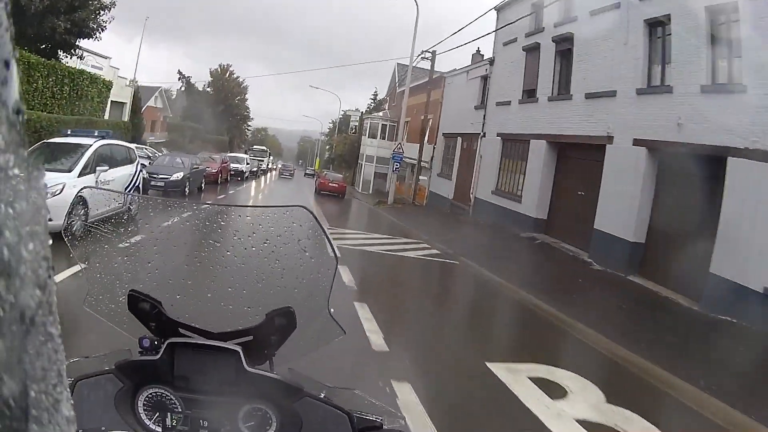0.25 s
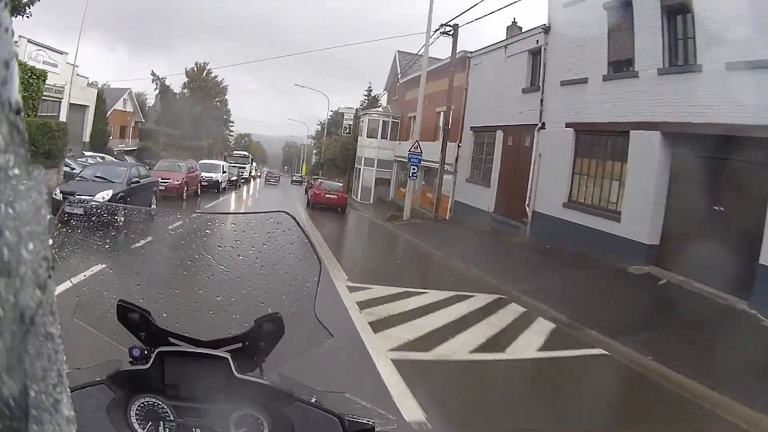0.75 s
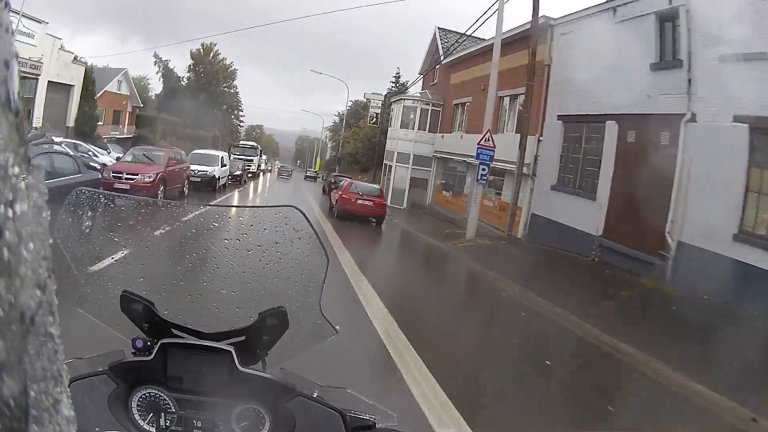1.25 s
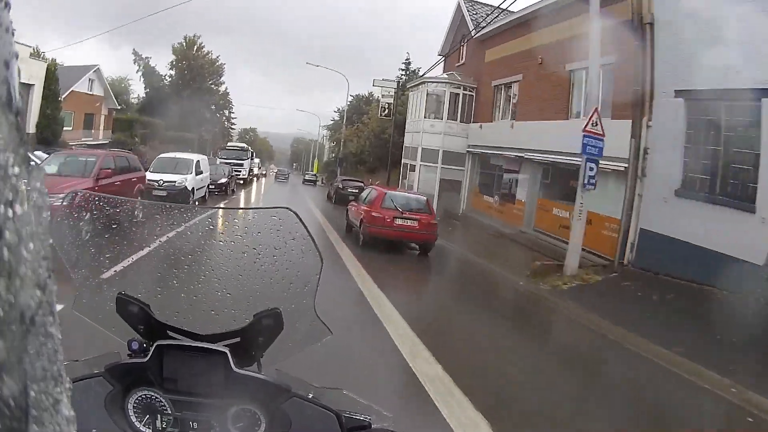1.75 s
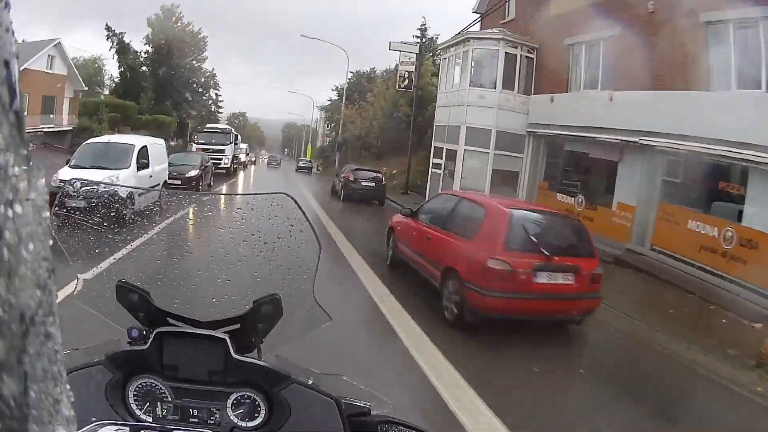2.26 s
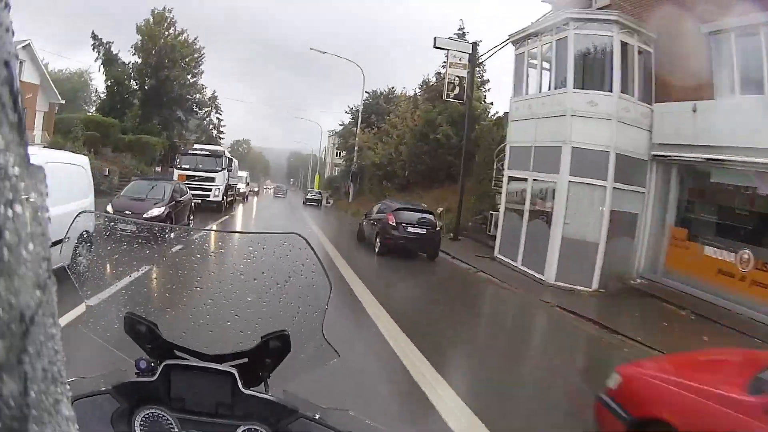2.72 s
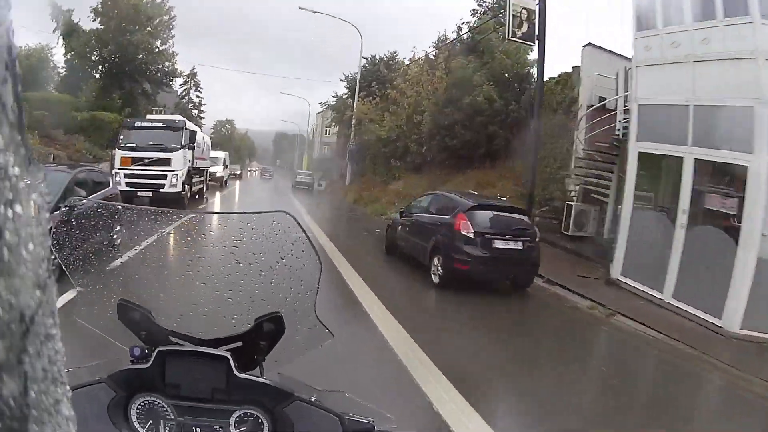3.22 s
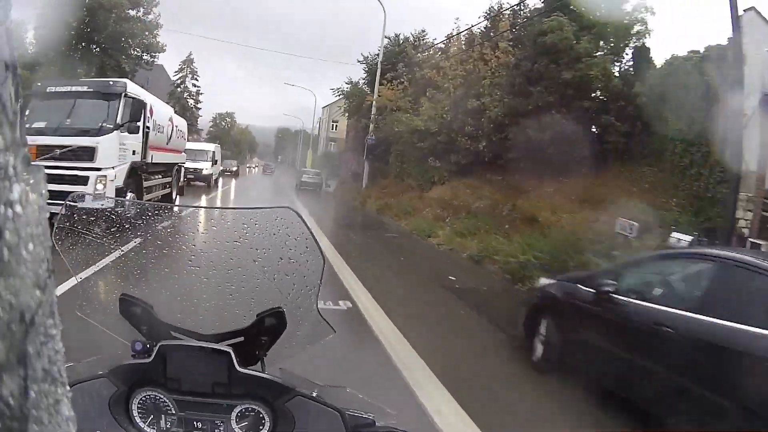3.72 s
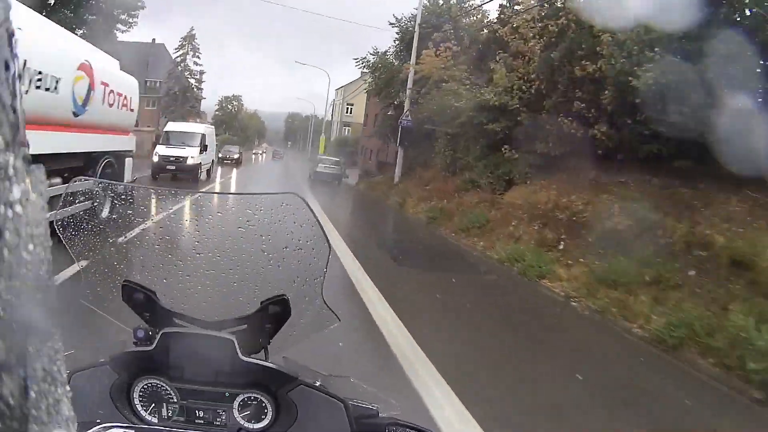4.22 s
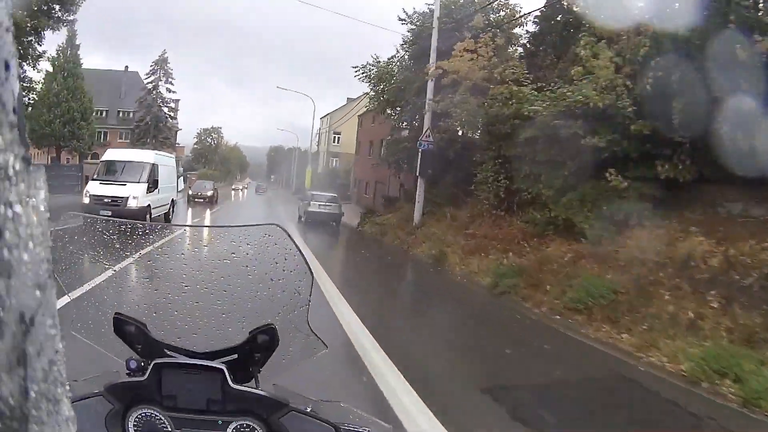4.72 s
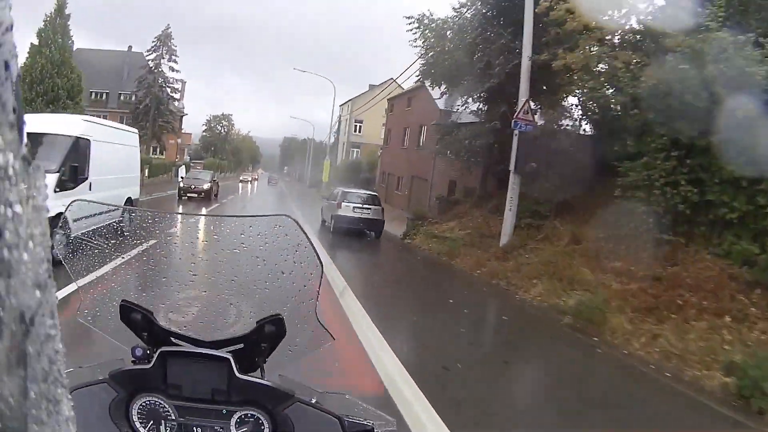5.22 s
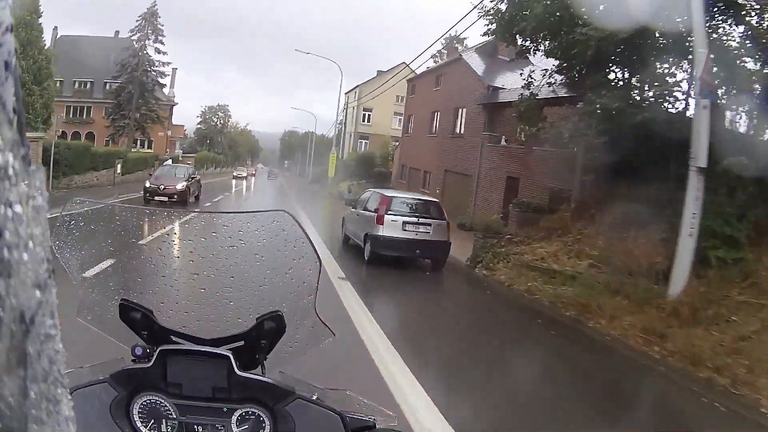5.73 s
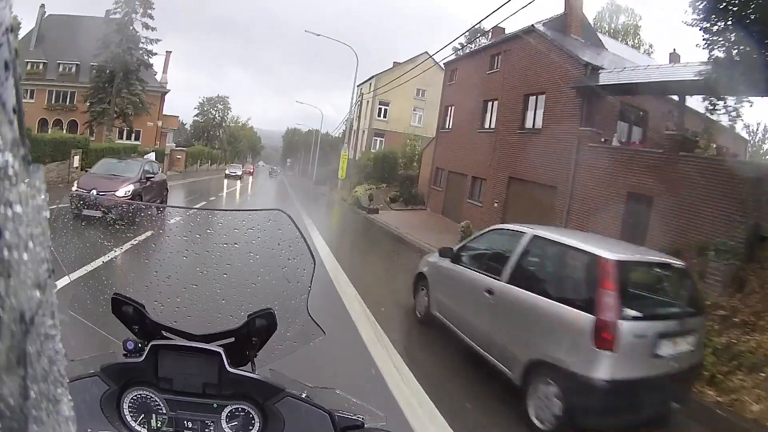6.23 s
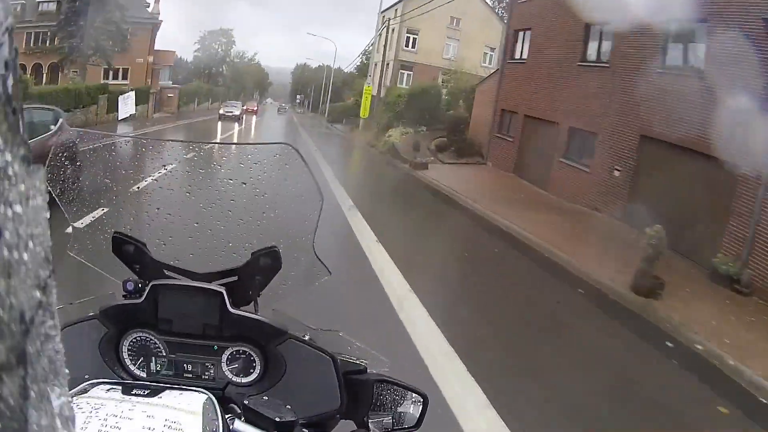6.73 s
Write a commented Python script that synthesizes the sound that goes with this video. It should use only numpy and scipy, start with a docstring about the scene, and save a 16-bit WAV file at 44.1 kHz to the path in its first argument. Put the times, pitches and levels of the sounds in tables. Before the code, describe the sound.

Heavy raindrops tap close to the microphone over the steady wind rumble and low engine hum of a motorcycle ride.

```python
"""Motorcycle in heavy rain

A steady ride along a wet street, heard at the two ports of a microphone on the rider's helmet.
The engine hums at multiples of its crank speed under wind, tyre roar, spray and the swish of traffic.
Raindrops tick on the hard shell around the microphone: each impact excites damped modes and splashes."""
import sys
import numpy as np
from scipy import signal
from scipy.fft import rfft, irfft, next_fast_len
from scipy.io import wavfile
from scipy.ndimage import uniform_filter1d

SR = 44100
rng = np.random.default_rng(int(sys.argv[2]) if len(sys.argv) > 2 else 0)


def unload_audio(sound):
    """Save the sound as a 16-bit wav file, at the path given as the first command line argument."""
    columns = np.transpose(np.atleast_2d(sound))
    # keep every value between -1 and 1, then stretch to whole-number steps
    steps = np.round(np.clip(columns, -1, 1) * 32767)
    wavfile.write(sys.argv[1], SR, steps.astype(np.int16))


N = 307377

# Spectral densities of the noise sources: frequency_hz, relative_db
WIND_SPECTRUM = [(20, -17), (28, -9), (38, -4.5), (50, -8.5), (72, -0.5), (90, -1.5), (125, -4.5),
                 (190, -15), (250, -15)]
TYRE_SPECTRUM = [(150, -6), (194, -7.5), (269, -2), (366, -6.5), (437, -6.5), (520, -11.5), (700, -36.5)]
TRAFFIC_SPECTRUM = [(480, -3.5), (600, 2), (800, -2.5), (1000, -7.5), (1400, -14.5)]
SPRAY_SPECTRUM = [(900, 9.5), (1300, -2.5), (1800, -19), (2700, -22), (3500, -11.5), (4800, -18),
                  (9400, -19), (12200, -26), (13000, -40)]
SPLASH_SPECTRUM = [(4000, 18), (5500, 13), (7000, 10.5), (9000, 9), (11000, 1), (13000, -10)]
HISS_SPECTRUM = [(2500, 0), (6000, 2), (12600, 0.17)]
# Strength of the wind on the helmet and of passing traffic: time_s, level_db
WIND_LEVEL = [(0, -40), (2.8, -39), (3.5, -36), (4.2, -38), (5, -40.5), (6.97, -40)]
TRAFFIC_LEVEL = [(0, -55.5), (1.3, -56.5), (3.6, -53.5), (4.1, -53), (4.5, -48.5), (5.2, -54), (6.0, -56.5),
                 (6.5, -52), (6.97, -57.5)]
# Crank speed: time_s, rotation_hz
CRANK_SPEED = [(0, 36.5), (.4, 36.8), (.8, 35.7), (1.4, 35.3), (1.9, 36.1), (2.5, 37.1), (2.9, 36.3),
               (3.5, 36.7), (4.0, 36.4), (4.5, 35.4), (5.1, 36.2), (5.7, 37.5), (6.1, 37.2), (6.5, 38.5),
               (6.97, 40)]
# Engine orders: cycles_per_turn
ENGINE_ORDERS = [1, 2, 3, 4, 12]
# Slow swelling and sinking of each order: spread_db
ORDER_SURGE = [1.0, 1.2, 1.5, 3.0, 2.5]
# Varying orders, with the gear whine at order 12: time_s, second_db, third_db, whine_db
ORDER_LEVELS = [(0.05, -35, -46, -50.5), (0.28, -37.5, -47, -47), (0.58, -40, -40, -49),
                (0.74, -36, -50, -49), (0.82, -49, -43, -50.5), (1.1, -38, -49.5, -53.5),
                (1.37, -44, -35, -52), (2.5, -39, -43.5, -55.5), (2.58, -40, -53, -56.5),
                (2.64, -38, -42, -49), (2.68, -41, -59, -54.5), (3.54, -32.5, -43, -49.5),
                (3.77, -50.5, -48.5, -53.5), (3.86, -33.5, -45, -48.5), (4.07, -56, -37, -54.5),
                (4.19, -35, -44, -52), (4.48, -43, -46, -55.5), (4.84, -43.5, -38, -49),
                (5.19, -42.5, -43, -56), (5.84, -38, -39, -55), (6.12, -37, -48, -58),
                (6.45, -36, -41.5, -53), (6.56, -46, -41, -59), (6.93, -30, -41, -53)]
# Resonances of the shell: frequency_hz, relative_db, t60_s
SHELL_MODES = [(517, 5, 0.032), (627, -7.5, 0.029), (741, -11, 0.07), (791, 11.5, 0.022), (902, 6, 0.021),
               (1010, 4, 0.034), (1206, -1, 0.072), (1291, 7, 0.034), (1467, 1.5, 0.055),
               (1666, 2.5, 0.053), (1744, 13, 0.015), (1970, -4, 0.037), (2135, 2, 0.05), (2202, 5, 0.027),
               (2473, -1, 0.03), (2650, -3.5, 0.015), (2883, 2.5, 0.026), (3031, -3, 0.017),
               (3210, -2.5, 0.026), (3444, 1.5, 0.013), (3747, -8, 0.03), (4060, -9.5, 0.02),
               (4200, -14, 0.012)]
# Dull knocks through the shell: start_s, peak_db, pitch_hz, swell_s
SHELL_KNOCKS = [(.527, -47, 296, 0.0018), (1.136, -25.5, 280, 0.00091), (1.493, -25.5, 343, 0.0013),
                (1.557, -26, 239, 0.0013), (4.146, -30.5, 431, 0.0014), (5.927, -42, 231, 0.0028),
                (6.21, -33, 232, 0.0016), (6.2168, -45, 326, 0.0034), (6.2191, -19.5, 346.2, 0.0011)]
# Strength of the fine and middling rain: time_s, gain_db
RAIN_GAIN = [(0, 1.5), (1.3, 1), (2.4, 1), (3.2, 0), (4.5, 2), (5.6, -0.5), (6.97, 0)]
# Large drop impacts: start_s, ring_hz, lower_peak_db, upper_peak_db, splash_peak_db
LARGE_DROPS = [(0.0503, 1830, -32.5, -43, -55), (0.1566, 1460, -36.5, -45, -49),
               (0.2206, 3730, -48, -52, -37), (0.24, 2970, -30, -38, -50), (0.2548, 2130, -30.5, -37, -42),
               (0.3357, 1800, -40, -46, -45), (0.3543, 3500, -46, -44, -45),
               (0.3714, 2910, -35, -43, -43.5), (0.385, 2530, -40, -47, -60), (0.4065, 2660, -42, -46, -60),
               (0.4204, 1740, -38, -46, -56), (0.439, 2820, -43, -43, -50), (0.4582, 2270, -40, -44, -48),
               (0.5295, 1240, -26.5, -37, -38), (0.5661, 3220, -38, -38, -36.5),
               (0.5715, 1790, -33, -37, -50), (0.6055, 2970, -27.5, -33.5, -50),
               (0.6514, 2420, -40, -43, -54), (0.6683, 1560, -36, -52, -55),
               (0.6949, 3680, -42, -35, -37.5), (0.703, 2930, -35.5, -44, -51),
               (0.7208, 2420, -41, -45, -46), (0.7714, 3410, -50, -44, -57), (0.7871, 1730, -45, -56, -52),
               (0.8246, 2520, -33.5, -33.5, -38.5), (0.8677, 3320, -49, -42, -42),
               (0.8769, 1750, -39, -42, -56), (0.8902, 2710, -33, -36.5, -48),
               (0.8977, 1240, -52, -54, -48), (0.9072, 2190, -36, -43, -50),
               (0.9509, 2140, -31, -38, -40.5), (0.9712, 2880, -35, -36, -43),
               (0.9974, 1740, -38, -45, -51), (1.005, 1400, -39, -50, -53), (1.0215, 2740, -52, -45, -54),
               (1.0712, 2880, -34, -37, -43), (1.0918, 2870, -40, -41, -53), (1.1036, 3460, -47, -45, -51),
               (1.1311, 3090, -44, -36.5, -47), (1.224, 1730, -25, -34.5, -44),
               (1.2338, 1390, -40, -42, -51), (1.261, 3190, -39, -45, -55),
               (1.293, 3480, -44, -32.5, -35.5), (1.307, 2520, -33, -36.5, -41),
               (1.3381, 1180, -35, -42, -42), (1.3461, 2090, -31, -43, -47), (1.404, 1910, -44, -41, -44),
               (1.4192, 1540, -39, -44, -41), (1.4385, 1590, -30, -45, -45), (1.445, 1500, -44, -43, -52),
               (1.4592, 1390, -40, -48, -51), (1.4917, 1610, -23, -31, -34.5), (1.498, 1260, -37, -39, -45),
               (1.519, 1520, -38, -45, -52), (1.5274, 2590, -43, -42, -45), (1.5577, 1990, -37, -53, -53),
               (1.5747, 3100, -39, -39, -51), (1.6376, 1370, -35.5, -48, -54),
               (1.666, 3180, -35, -40.5, -49), (1.6733, 1650, -33, -47, -54), (1.6966, 2930, -39, -41, -49),
               (1.709, 2940, -44, -43, -52), (1.722, 1450, -37, -44, -57), (1.7455, 1310, -36.5, -48, -57),
               (1.7941, 1720, -25, -35, -48), (1.8076, 1110, -29, -41, -54),
               (1.8152, 2000, -28.5, -31.5, -36.5), (1.8757, 2550, -36.5, -39.5, -50),
               (1.933, 1600, -36, -48, -45), (1.947, 2040, -30.5, -40, -50), (1.9837, 4200, -50, -46, -44),
               (2.0182, 1680, -30.5, -40, -60), (2.0963, 1530, -39, -46, -61),
               (2.1339, 2990, -39, -34, -41), (2.1705, 2500, -30, -37, -48),
               (2.1986, 2880, -33.5, -36, -44), (2.227, 2570, -40, -44, -51), (2.2878, 1690, -36, -42, -60),
               (2.3005, 2640, -36, -40, -51), (2.3514, 3440, -41, -34, -33.5),
               (2.3735, 2550, -33, -35.5, -41), (2.3847, 3370, -45, -47, -46), (2.402, 3080, -45, -42, -52),
               (2.4136, 2560, -44, -50, -50), (2.4911, 2190, -32.5, -39, -47),
               (2.5463, 2110, -34, -44, -51), (2.593, 2950, -34.5, -40.5, -51),
               (2.6506, 3810, -47, -46, -43), (2.6786, 2050, -38.5, -46, -58),
               (2.7495, 1250, -38, -58, -65), (2.7716, 1390, -40, -41.5, -47),
               (2.8149, 2360, -36, -37, -37.5), (2.8203, 1650, -34.5, -47, -67),
               (2.8608, 1960, -36, -44, -56), (2.8717, 2150, -41, -46, -46), (2.8987, 2680, -42, -44, -48),
               (2.9605, 2390, -40, -44, -52), (2.9862, 4160, -40, -41, -43), (3.0932, 3190, -36, -37, -62),
               (3.1345, 2430, -37.5, -45, -55), (3.2049, 3090, -52, -47, -52),
               (3.2276, 1730, -33.5, -45, -56), (3.3936, 1110, -33, -44, -55),
               (3.4379, 2860, -43, -46, -56), (3.452, 2900, -49, -40, -46), (3.4609, 1610, -38, -47, -39),
               (3.4716, 3260, -30.5, -33.5, -38), (3.4799, 1730, -32, -46, -52),
               (3.5251, 2900, -39, -35, -43), (3.5393, 1860, -38.5, -47, -56),
               (3.584, 3580, -40, -36.5, -36.5), (3.6847, 3530, -54, -39, -45),
               (3.7169, 1840, -34, -39, -48), (3.7225, 1250, -35, -36.5, -63),
               (3.7508, 3200, -39, -43, -51), (3.7932, 1650, -32, -49, -52),
               (3.851, 1640, -34.5, -38.5, -46), (3.9035, 1550, -42, -46, -48),
               (3.9339, 3340, -51, -43, -44), (3.986, 1660, -43, -43, -43),
               (3.9913, 2830, -36.5, -37, -39.5), (3.9968, 3030, -44, -48, -50),
               (4.025, 2870, -48, -44, -50), (4.0551, 2250, -40, -42, -47), (4.0992, 2270, -34.5, -41, -46),
               (4.239, 1310, -33.5, -54, -45), (4.4199, 3400, -39, -39, -46), (4.4277, 3590, -46, -37, -42),
               (4.455, 3400, -37, -39, -44), (4.47, 1670, -38, -45, -43.5), (4.512, 3160, -36, -38.5, -53),
               (4.6413, 2810, -40, -47, -56), (4.6523, 2050, -40, -44, -48),
               (4.6914, 3250, -38, -41, -45.5), (4.7237, 1110, -38, -46, -56),
               (4.7339, 1110, -35, -43, -44), (4.8042, 3540, -49, -45, -42),
               (4.8375, 1400, -28.5, -41, -43), (4.8423, 1690, -36, -59, -57), (4.866, 1780, -41, -42, -56),
               (5.0785, 3170, -44, -44, -38.5), (5.0888, 3470, -46, -33.5, -41),
               (5.1494, 1810, -37, -50, -60), (5.169, 2890, -39, -47, -56), (5.216, 2880, -32, -35, -45.5),
               (5.3423, 2930, -43, -40, -51), (5.3607, 2910, -41, -40, -42),
               (5.3933, 3200, -53.5, -47, -47), (5.4312, 3380, -39, -39, -37.5),
               (5.5458, 1290, -28.5, -41, -44), (5.6229, 2060, -30, -45, -63),
               (5.8009, 1743, -39.5, -52, -55), (5.8604, 2530, -39.5, -47, -49),
               (5.8797, 3382, -39, -38, -38), (5.9314, 1320, -23, -36, -49), (5.9517, 1320, -40, -47, -57),
               (6.0043, 1750, -33, -38, -43), (6.015, 3030, -40, -44, -46), (6.0981, 1720, -33, -37.5, -42),
               (6.1303, 3210, -43, -39, -48), (6.1427, 3000, -41, -39, -53), (6.148, 3690, -44, -43, -45),
               (6.213, 3250, -34, -46, -47), (6.2167, 1150, -34, -43, -61), (6.2273, 1510, -37, -61, -63),
               (6.295, 2540, -55, -42.5, -43), (6.327, 3260, -39, -45, -42), (6.3552, 1250, -36, -47, -54),
               (6.4001, 2620, -39, -40, -42), (6.4157, 1970, -39, -42, -52), (6.465, 1590, -29.5, -34, -42),
               (6.5422, 3180, -41, -41, -49), (6.5715, 2090, -37.5, -37, -50),
               (6.5962, 3410, -39, -41, -50), (6.6232, 3570, -39, -45, -41.5),
               (6.6576, 1670, -39, -37, -46), (6.6659, 3220, -52, -42, -49),
               (6.6996, 2520, -33.5, -35.5, -44), (6.7186, 3900, -54, -48, -41.5),
               (6.7601, 4035, -43, -49, -52), (6.771, 3600, -41, -37, -44), (6.8301, 3180, -51, -41, -53),
               (6.8968, 2050, -36, -45, -53), (6.9045, 1250, -37, -51, -48), (6.959, 3670, -45, -38.5, -35)]

BODY_BELOW_HZ, UPPER_FROM_HZ = 950, 2400   # bounds of the deepest and the upper shell modes
IMPACT_BOOST, IMPACT_S = 0.65, 0.0012   # the ring is strongest while the drop still spreads


def from_db(db):
    """Amplitude grows tenfold with every 20 decibels."""
    return 10 ** (np.asarray(db) / 20)


def rms_one(x):
    """Normalisation to unit mean power."""
    return x / np.sqrt(np.mean(x ** 2) + 1e-20)


def peak_one(sounds):
    """Normalisation of each row to unit peak."""
    return sounds / np.abs(sounds).max(axis=1, keepdims=True)


def in_time(rows):
    """Linear interpolation gives each column of a curve one value per sample."""
    time_s, *columns = np.transpose(rows)
    return [np.interp(np.arange(N) / SR, time_s, column) for column in columns]


def colour(x, spectrum):
    """Filtering multiplies by a spectrum, here one that falls steeply beyond its ends."""
    hz = np.maximum(np.fft.rfftfreq(x.shape[-1], 1 / SR), 1)
    knot_hz, db = np.transpose(spectrum)
    octaves_out = np.maximum(np.log2(knot_hz[0] / hz), 0) + np.maximum(np.log2(hz / knot_hz[-1]), 0)
    gain_db = np.interp(np.log(hz), np.log(knot_hz), db) - 16.7 * octaves_out
    return irfft(rfft(x) * from_db(gain_db), x.shape[-1])


def drift(rate_hz):
    """Low-pass noise of unit rms wanders about rate_hz times a second."""
    step = 40
    pole = np.exp(-2 * np.pi * rate_hz * step / SR)
    white = rng.standard_normal(N // step + 2002)
    slow = signal.lfilter([1], [1, -2 * pole, pole * pole], white)[2000:]
    return np.interp(np.arange(N) / step, np.arange(len(slow)), rms_one(slow))


def rush(spectrum, flicker_db, rate_hz):
    """Random amplitude modulation makes coloured noise flicker."""
    white = rng.standard_normal(next_fast_len(N))
    return rms_one(colour(white, spectrum)[:N] * from_db(flicker_db * drift(rate_hz)))


def place(start_s, sounds):
    """Superposition: short sounds add, each from its own start."""
    at = (np.asarray(start_s) * SR).astype(int)[:, None] + np.arange(sounds.shape[1])
    return np.bincount(at.ravel(), sounds.ravel(), N + sounds.shape[1])[:N]


def faint_stereo_hiss():
    """A faint, wide treble hiss, opposite in left and right."""
    return from_db(-83.5) * rush(HISS_SPECTRUM, flicker_db=3.0, rate_hz=25.0) * [[1], [-1]]


def wind():
    """Turbulent pressure buffets the helmet at low frequencies."""
    return from_db(*in_time(WIND_LEVEL)) * rush(WIND_SPECTRUM, flicker_db=1.2, rate_hz=5.0)


def tyre_roar():
    """Rolling contact radiates a low band of noise."""
    return from_db(-43.5) * rush(TYRE_SPECTRUM, flicker_db=2.0, rate_hz=10.4)


def traffic():
    """Passing traffic is midrange noise under a slow envelope."""
    return from_db(*in_time(TRAFFIC_LEVEL)) * rush(TRAFFIC_SPECTRUM, flicker_db=1.5, rate_hz=22.0)


def spray():
    """Countless droplets add incoherently to a broadband hiss."""
    return from_db(-63.5) * rush(SPRAY_SPECTRUM, flicker_db=1.5, rate_hz=70.0)


def engine(waver=0.008, rough_db=0.8, first_db=-46, fourth_db=-49.5):
    """Harmonics of the crank rotation; uneven firing modulates their pitch and strength."""
    rotation_hz, = in_time(CRANK_SPEED)
    second_db, third_db, whine_db = in_time(ORDER_LEVELS)
    levels_db = first_db, second_db, third_db, fourth_db, whine_db
    turns = np.cumsum(rotation_hz * (1 + waver * drift(5.56))) / SR
    hum = np.zeros(N)
    for order, level_db, surge_db in zip(ENGINE_ORDERS, levels_db, ORDER_SURGE):
        rms = from_db(level_db + surge_db * drift(2.42) + rough_db * drift(24.0))
        hum += np.sqrt(2) * rms * np.sin(2 * np.pi * (order * turns + rng.random()))
    return hum


def knocks():
    """A heavily damped low resonance swells and dies within a few cycles."""
    start_s, peak_db, pitch_hz, swell_s = np.array(SHELL_KNOCKS).T[:, :, None]
    t = np.arange(2048) / SR
    swell = t / swell_s * np.exp(1 - t / swell_s)
    return place(start_s[:, 0], from_db(peak_db) * swell * np.sin(2 * np.pi * pitch_hz * t))


def shell_rings(modes, ring_hz, detune, rough):
    """Impact excites damped modes, most near ring_hz; the moving water film detunes and roughens them."""
    t = np.arange(1536) / SR
    hz, level_db, t60_s = modes.T[:, :, None]
    attack = np.clip(t / 0.0006, 0, 1)   # the drop flattens in under a millisecond
    fade = from_db(level_db - 60 * t / t60_s) * attack * (1 + IMPACT_BOOST * np.exp(-t / IMPACT_S))
    near_db = -np.minimum(20 * np.abs(np.log2(hz.T / ring_hz[:, None])), 5)
    strength = from_db(near_db + 3.07 * rng.standard_normal(near_db.shape))
    start_phase = 2 * np.pi * rng.random(near_db.shape)
    weight = np.hstack([strength * np.cos(start_phase), strength * np.sin(start_phase)])
    rings = np.zeros((len(ring_hz), len(t)))
    for film in range(12):   # the drops share twelve states of the film
        phase = 2 * np.pi * hz * (1 + detune * rng.standard_normal(hz.shape)) * t
        rings[film::12] = weight[film::12] @ np.vstack([fade * np.sin(phase), fade * np.cos(phase)])
    flutter = uniform_filter1d(rng.standard_normal(rings.shape), size=49, axis=1) * 7   # unit variance
    return peak_one(rings * (1 + rough * flutter))


def splashes(count):
    """A brief burst has a broad spectrum; each splash has its own bright centre and a faint tail."""
    t = np.arange(-64, 704) / SR
    fade = (from_db(-60 * t / 0.006) + from_db(-16 - 60 * t / 0.042)) * np.clip(t / 0.00024, 0, 1)
    burst = colour(rng.standard_normal((count, len(t))) * fade, SPLASH_SPECTRUM)
    hz = np.maximum(np.fft.rfftfreq(len(t), 1 / SR), 1)
    centre_hz = 5000 * 2 ** (1.2 * rng.random((count, 1)))
    burst = irfft(rfft(burst) * from_db(-5.0 * np.abs(np.log2(hz / centre_hz))), len(t))
    return peak_one(burst[:, 56:])


def drops(start_s, ring_hz, lower_db, upper_db, splash_db, body_gain_db=-9):
    """Shell vibration reaches both ports alike; a splash is louder at the nearer port."""
    modes = np.array(SHELL_MODES)
    is_upper, is_deep = modes[:, 0] > UPPER_FROM_HZ, modes[:, 0] < BODY_BELOW_HZ
    lower = shell_rings(modes[~is_upper], ring_hz, detune=0.053, rough=0.37) * from_db(lower_db)[:, None]
    upper = shell_rings(modes[is_upper], ring_hz, detune=0.036, rough=0.39) * from_db(upper_db)[:, None]
    body = shell_rings(modes[is_deep], ring_hz, detune=0.1, rough=0.5)
    body *= from_db(lower_db + body_gain_db)[:, None]
    splash = splashes(len(start_s)) * from_db(splash_db)[:, None]
    lean_left = 0.16 * rng.standard_normal((len(start_s), 1)) - 0.04
    centre = place(start_s, body + lower + upper) + place(start_s, splash)
    return centre + place(start_s, lean_left * splash) * [[1], [-1]]


def fine_rain(drops_per_s=300, level_db=-58.5):
    """Dense small impacts, random in moment, spot and size, fuse into a patter."""
    when, size, spot, upper, wet = rng.random((int(drops_per_s * N / SR), 5)).T
    ring_hz = 800 * 2 ** (1.7 * spot)
    size_db = np.minimum(-3.0 * np.log(1 - size), 8)
    patter = drops(when * N / SR, ring_hz, size_db, size_db - 15 + 12 * upper, size_db - 18.5 + 14 * wet)
    return from_db(level_db) * rms_one(patter)


def middling_drops(drops_per_s=40, top_db=-44, range_db=10.5):
    """Sparser random impacts stay distinct; each mixes rings and splash in its own proportion."""
    when, size, spot, lower, upper, wet = rng.random((int(drops_per_s * N / SR), 6)).T
    ring_hz = 1000 * 2 ** (1.5 * spot)
    size_db = top_db - range_db * size
    lower_db = size_db - 2.8 * lower ** 2
    upper_db = size_db - 2 + 3.0 * (upper - 0.5)
    splash_db = size_db - 12 + 17.0 * (wet - 0.5)
    return drops(when * N / SR, ring_hz, lower_db, upper_db, splash_db)


def large_drops():
    """The strongest impacts escape masking and stand out one by one."""
    return drops(*np.array(LARGE_DROPS).T)


def scene():
    """The sources superpose almost alike in both channels, the left slightly louder."""
    ride = wind() + tyre_roar() + traffic() + spray() + engine()
    rain = large_drops() + from_db(*in_time(RAIN_GAIN)) * (middling_drops() + fine_rain())
    balance = from_db([[0.75], [-0.75]])
    return (ride + rain + knocks()) * balance + faint_stereo_hiss()


def record(dry, stopband_hz=13857):
    """A steep low-pass filter removes the highest treble."""
    return signal.sosfilt(signal.cheby2(14, 70, stopband_hz, fs=SR, output="sos"), dry)


dry = scene()
out = record(dry)
unload_audio(out)
```